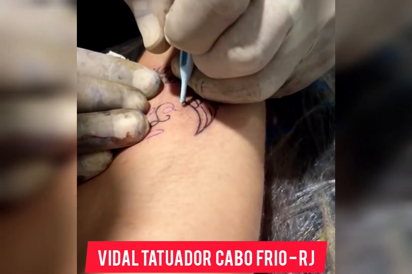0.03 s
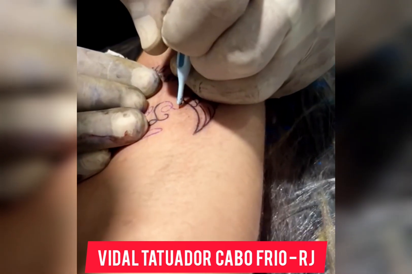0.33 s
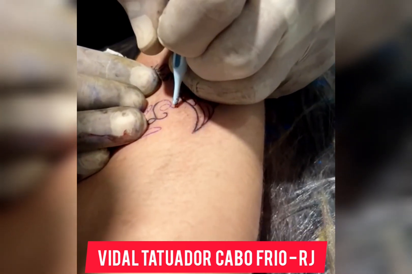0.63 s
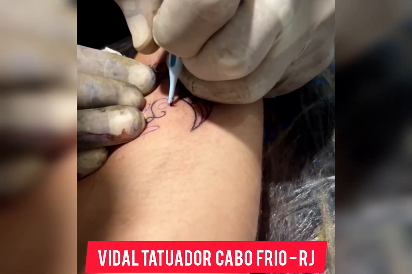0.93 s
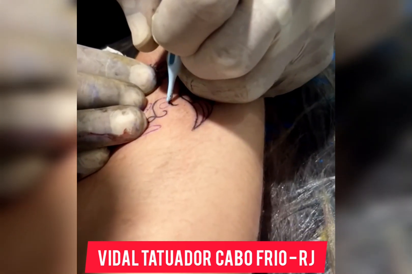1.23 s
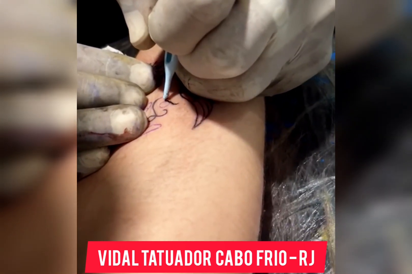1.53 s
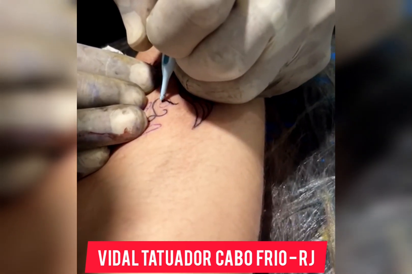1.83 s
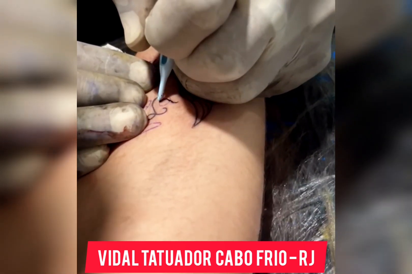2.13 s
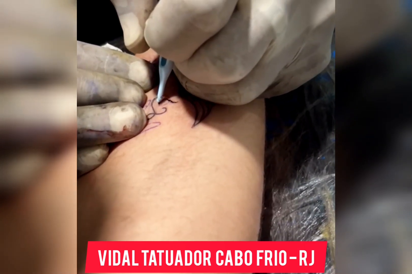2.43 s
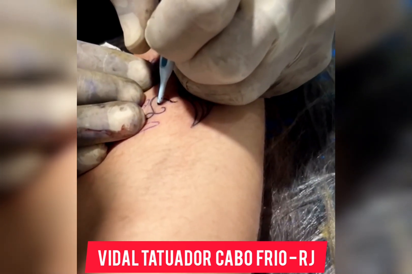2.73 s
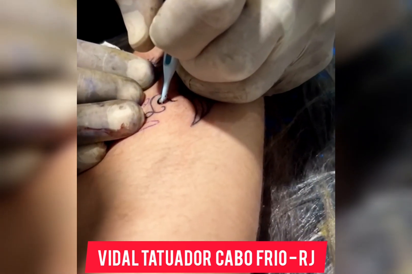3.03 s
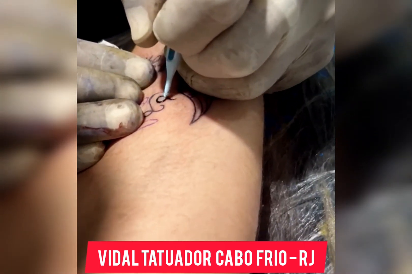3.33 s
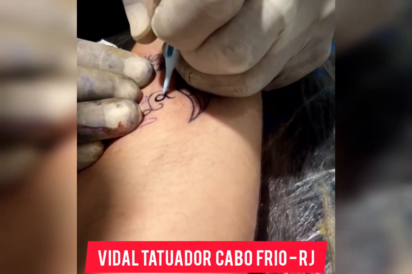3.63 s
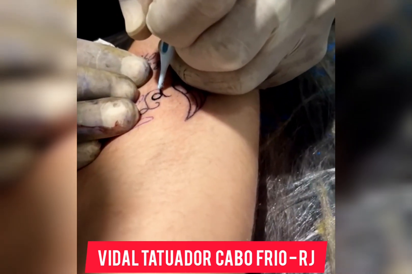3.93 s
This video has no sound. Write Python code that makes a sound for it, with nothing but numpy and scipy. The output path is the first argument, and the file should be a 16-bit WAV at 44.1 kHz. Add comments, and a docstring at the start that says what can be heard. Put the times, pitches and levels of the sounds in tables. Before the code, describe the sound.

A tattoo machine buzzes close to the microphone for the whole four seconds, a dense, even tone with a rapid metallic rattle and a very high ring. At about 2.5 seconds the pitch dips very slightly and the tone shifts as the needle presses into skin. A thin, high sizzle grows gradually from about one second on. A faint low rumble of the small room lies underneath.

```python
"""Coil tattoo machine on skin

The machine buzzes steadily, close to a two-port microphone in a small room with a low rumble.
Its armature strikes about 105 times a second and slows a little as the needle is pressed in.
By periodic impact, every stroke hums in the frame, thuds, clacks on the coils and ticks on the
contact spring, which rings very high; a very high sizzle sounds with the ring on each stroke."""
import sys
import numpy as np
from scipy import signal
from scipy.fft import rfft, irfft, next_fast_len
from scipy.io import wavfile
from scipy.ndimage import map_coordinates

SR = 44100
rng = np.random.default_rng(int(sys.argv[2]) if len(sys.argv) > 2 else 0)


def persist_wave(psi):
    """Save psi, clipped to +-1, as 16-bit WAV."""
    counts = np.round(np.clip(psi, -1, 1) * 32767).astype(np.int16)
    wavfile.write(sys.argv[1], SR, np.atleast_2d(counts).T)


N = 176400

# The armature's pace. Each row: time in seconds, strokes per second.
STROKE_RATE = [(0.0, 105.2), (0.49, 105.2), (0.91, 105.7), (0.99, 105.0), (1.6, 105.5), (1.64, 105.3),
               (2.45, 105.3), (2.55, 104.2), (2.82, 105.1), (2.94, 104.7), (2.99, 104.1), (3.0, 104.8),
               (3.36, 104.5), (3.4, 104.1), (3.71, 104.8), (3.98, 104.5), (4.0, 105.0)]

def machine(jitter_s=7e-6, scatter_db=.4):
    """Periodic excitation: one nearly regular armature cycle drives the hum, impacts and sizzle."""
    cycles = np.cumsum(curve(STROKE_RATE)) / SR + .11
    strokes = np.interp(np.arange(1, int(cycles[-1]) + 1), cycles, np.arange(N) / SR)
    strokes += jitter_s * rng.standard_normal(len(strokes))
    sizes = amp(scatter_db * rng.standard_normal(len(strokes)))
    return impacts(strokes, sizes) + sizzle(strokes) + frame_hum(cycles)


# Spectra of the struck parts. Each row: frequency in Hz, relative level in dB.
ARMATURE_THUD = [(1080, -21), (1250, -24), (1500, -2.5), (1650, -4.5), (1900, -5), (2100, 0.5)]
COIL_CLACK = [(2250, -22), (2480, -13), (2740, -16.5), (2850, -11), (3400, -15.5), (4300, -15), (4800, -12),
              (5500, -11.5), (5900, -19), (6350, -17), (6700, -26)]
SPRING_TICK = [(6700, -16.5), (7050, -10), (8200, -10), (9000, -8.5), (9400, -12), (9700, -29.5)]
SPRING_RING = [(9600, -16.5), (10100, -4), (10450, -5.5), (10830, 3.5), (11150, -1.5), (11450, -10.5)]
# Their strength over time. Each row: time in seconds, relative level in dB.
CLACK_ENVELOPE = [(0.0, -31.5), (0.49, -31.5), (0.76, -33), (2.4, -32.5), (3.5, -30.5), (3.68, -32.5),
                  (4.0, -31.5)]
TICK_ENVELOPE = [(0.0, -34.5), (0.26, -34.5), (0.78, -35.5), (0.89, -34), (1.06, -37.5), (1.34, -35),
                 (1.56, -36.5), (2.43, -36.5), (2.53, -38), (3.32, -35.5), (4.0, -36.5)]
RING_ENVELOPE = [(0, -24), (0.3, -22), (0.6, -22.5), (0.75, -22.5), (0.81, -26.5), (0.87, -22.5),
                 (0.98, -24.5), (1.1, -23), (1.3, -23), (1.45, -25.5), (1.6, -25.5), (1.86, -26),
                 (2.3, -26.5), (2.6, -26.5), (3.0, -26.5), (3.3, -26), (3.65, -27.5), (4, -27)]

def impacts(strokes, sizes):
    """Superposition: armature, coils and spring answer the same blows, each in its own band."""
    thud = strike(strokes + .00029, sizes, ARMATURE_THUD, contact_s=.00028, rattle_s=.0038, room_db=-5)
    clack = strike(strokes + .0002, sizes, COIL_CLACK, contact_s=.0018, rattle_s=.0031, room_db=-4.5)
    tick = strike(strokes + .000201, sizes, SPRING_TICK, contact_s=.00051, rattle_s=.0028, room_db=-2)
    ring = strike(strokes + .000199, sizes, SPRING_RING, contact_s=.000513, rattle_s=.0016, room_db=-10.5)
    return (amp(-52.5) * thud
            + amp(curve(CLACK_ENVELOPE) + 4) * clack
            + amp(curve(TICK_ENVELOPE) + 5) * tick
            + amp(curve(RING_ENVELOPE) + 2) * ring)


def strike(times, sizes, spectrum, contact_s, rattle_s, room_db, rattle_db=-6, hiss_db=-8):
    """Impact excitation: a brief contact and a loose rattle ring a part, and the room answers."""
    blows = pulses(times, sizes * np.interp(times * SR, np.arange(N), needle_drag()))
    t = np.arange(SR // 50) / SR
    rattle_energy = np.abs(convolved(blows ** 2, np.exp(-2 * t / rattle_s))[0])
    rattle = unit(np.sqrt(rattle_energy) * rng.standard_normal(N))
    low, high = spectrum[0][0], spectrum[-1][0]
    lag_s = lambda hz: contact_s * np.clip((high - hz) / (high - low), 0, 1)  # the highs arrive first
    contact = filtered(blows, lambda hz: np.exp(-2j * np.pi * np.cumsum(lag_s(hz)) * hz[1]))
    sound = through_frame(unit(contact) + amp(rattle_db) * rattle, spectrum)[0]
    direct = unit(filtered(sound, ports))
    hiss = unit(convolved(rng.standard_normal((2, N)), resonance(spectrum)))
    diffuse = room(sound) + amp(hiss_db) * hiss
    return unit(direct + amp(room_db) * diffuse)


# Sharp modes of the steel frame. Each row: frequency in Hz with a light touch,
# frequency in Hz when pressed, width in Hz, gain in dB.
FRAME_MODES = [(2586, 2570, 69, 6.5), (3084, 3045, 150, 12.5), (3256, 3345, 51, 5.5), (3525, 3560, 95, 6.5),
               (3843, 3890, 230, 11), (4167, 4050, 106, 7), (4600, 5100, 90, 6.5), (4940, 4910, 150, 8.5),
               (5380, 5560, 130, 4), (8650, 7900, 380, 5.5)]

def through_frame(x, spectrum, size=4096, hand_wander=.22):
    """Modal resonance: the hand's wandering pressure blends two tunings of the frame's modes."""
    hz = np.fft.rfftfreq(size, 1 / SR)[:, None]
    light_hz, pressed_hz, width_hz, gain_db = np.transpose(FRAME_MODES)

    def ringing(centre_hz):
        peaks_db = np.sum(gain_db / (1 + (2 * (hz - centre_hz) / width_hz) ** 2), axis=1)
        return unit(convolved(x, resonance(spectrum, peaks_db)))

    light, pressed = ringing(light_hz), ringing(pressed_hz)
    load = np.clip(pressure() + hand_wander * wobble(7), 0, 1)
    return light + (pressed - light) * load


def pressure():
    """Loading: the needle goes from a light touch (0) to pressed in (1)."""
    return curve([(2.42, 0), (2.56, 1)])


def needle_drag(depth_db=.65):
    """Amplitude modulation: a part's gain wavers as the needle drags."""
    return amp(depth_db * wobble(6))


# Spectrum of the high sizzle. Each row: frequency in Hz, relative level in dB.
SIZZLE_SPECTRUM = [(11300, -4), (11700, 2.5), (11950, 4.5), (12250, 1), (12480, -8), (12900, -24.5)]
# Its strength over time. Each row: time in seconds, level in dB.
SIZZLE_ENVELOPE = [(0, -35), (.7, -37), (1.3, -34), (2, -31), (3, -30.5), (3.5, -29.5), (4, -29.5)]

def sizzle(strokes, burst_s=.00066, between_db=-13, room_db=-2.5):
    """Gated noise: a short, very high burst sounds with the spring's ring on each stroke."""
    t = np.arange(SR // 100) / SR
    burst = (t / burst_s) ** 2 * np.exp(-2 * t / burst_s)
    gate = convolved(pulses(strokes, np.ones(len(strokes))), burst)[0]
    noise = (unit(gate) + amp(between_db)) * rng.standard_normal(N)
    sound = convolved(noise, resonance(SIZZLE_SPECTRUM))[0]
    heard = unit(unit(filtered(sound, ports)) + amp(room_db) * room(sound, patterns=2))
    return amp(curve(SIZZLE_ENVELOPE)) * heard * needle_drag()


# Low partials of the frame. Each row: multiple of the stroke rate,
# level in dB with a light touch, level in dB when pressed.
FRAME_HARMONICS = [(1, -52.5, -57), (2, -58, -62), (3, -54.5, -56), (4, -60, -62), (5, -72.5, -75),
                   (6, -61, -61.5), (7, -59.5, -62.5), (8, -54.5, -50), (9, -65, -72), (10, -63, -63),
                   (11, -56.5, -58.5), (12, -48, -53), (13, -58, -60), (14, -49.5, -50.5), (15, -57, -59),
                   (16, -62.5, -61), (17, -50, -49), (18, -45, -45), (19, -55, -53), (20, -51.5, -52.5),
                   (21, -57.5, -55), (22, -68, -63), (23, -56.5, -51)]

def frame_hum(cycles, lag_s=.000914, waver_db=.9, scatter_rad=.65):
    """Forced vibration: the frame hums at harmonics of the stroke rate; pressing shifts their balance."""
    load = pressure()
    stroke_hz = np.mean(curve(STROKE_RATE))
    out = np.zeros((2, N))
    for harmonic, light_db, pressed_db in FRAME_HARMONICS:
        hz = harmonic * stroke_hz
        rms = amp(light_db + (pressed_db - light_db) * load + waver_db * wobble(7.04))
        phase = 2 * np.pi * (harmonic * cycles - hz * lag_s) + scatter_rad * rng.standard_normal()
        out += np.sqrt(2) * rms * np.real(ports(hz)[:, None] * np.exp(1j * phase))
    return out


# The machine's paths to the two ports. Each row: frequency in Hz,
# left-right phase difference in radians, left-right level difference in dB.
PORT_DIFFERENCES = [(105.0, -0.2, -1.8), (420.0, -0.7, -3.1), (840.0, -0.7, -0.2), (1260.0, 0.0, -0.0),
                    (1890.0, 0.3, 0.4), (2100.0, 0.5, -1.3), (2420.0, 1.5, -1.2), (2630.0, 2.9, -0.6),
                    (3120.0, 2.9, -1.2), (3270.0, 1.3, 2.5), (3470.0, 0.7, -0.3), (3830.0, 1.2, -1.6),
                    (4350.0, 1.7, -1.8), (4900.0, 1.5, -4.2), (5450.0, 2.7, -1.0), (6000.0, 3.1, -0.1),
                    (6700.0, 3.6, 0.1), (7100.0, 5.4, -0.3), (7900.0, 6.3, 0.3), (8650.0, 6.8, 0.3),
                    (9100.0, 7.9, 0.1), (9600.0, 9.2, -0.0), (10450.0, 9.7, 0.0), (10850.0, 10.2, 0.0),
                    (11200.0, 10.7, -0.3), (11450.0, 11.3, -0.1), (11900.0, 12.4, -0.0),
                    (12400.0, 12.6, -0.6)]

def ports(hz):
    """Path difference: the two ports get complex gains of opposite phase shift and level offset."""
    phase, level_db = along(PORT_DIFFERENCES, hz), along(PORT_DIFFERENCES, hz, column=2)
    left = amp(level_db / 2) * np.exp(.5j * phase)
    return np.array([left, 1 / left])


def room(x, patterns=5, t60_s=.11, gap_s=.0012):
    """Reverberation: short reflections decay exponentially; their pattern drifts as the hand moves."""
    t = np.arange(SR // 4) / SR
    position = np.linspace(0, patterns - 1, N)
    wet = np.zeros((2, N))
    for k in range(patterns):
        tail = rng.standard_normal((2, len(t))) * amp(-60 * t / t60_s) * (t > gap_s)
        crossfade = np.cos(np.pi / 2 * np.clip(position - k, -1, 1))
        wet += crossfade * convolved(x, tail)
    return unit(wet)


# The room's rumble. Each row: frequency in Hz, relative spectral density in dB.
RUMBLE_SPECTRUM = [(15, -25), (30, -5.5), (70, -4), (130, -4.5), (260, -10), (450, -10), (750, -12.5),
                   (980, -20.5), (1300, -11.5), (2500, -9), (5000, -63)]
# Its likeness at the two ports. Each row: frequency in Hz, correlation from 0 to 1.
RUMBLE_COHERENCE = [(30, 0.87), (120, 0.85), (300, 0.37), (800, 0.21), (1500, 0.79)]

def room_noise(start_db=-44.5, fall_db_per_s=.03):
    """Partial coherence: a low rumble, nearly alike at both ports in the bass, eases very slightly."""
    def mid_side_gains(hz):
        angle = np.arccos(np.clip(along(RUMBLE_COHERENCE, hz), -1, 1)) / 2
        return amp(along(RUMBLE_SPECTRUM, hz)) * [np.cos(angle), np.sin(angle)]

    mid, side = filtered(rng.standard_normal((2, N)), mid_side_gains)
    level_db = start_db - fall_db_per_s * np.arange(N) / SR + .16 * wobble(3.6)
    return amp(level_db) * unit(np.array([mid + side, mid - side]))


def resonance(spectrum, lift_db=0, size=4096):
    """Minimum phase: a part's causal impulse response, with steep skirts outside its band."""
    hz = np.fft.rfftfreq(size, 1 / SR)
    octaves_below = np.maximum(np.log2(spectrum[0][0] / (hz + 1)), 0)
    octaves_above = np.maximum(np.log2((hz + 1) / spectrum[-1][0]), 0)
    skirt_db = np.minimum(150 * (octaves_below + octaves_above), 55)
    cepstrum = irfft(np.log(amp(along(spectrum, hz) + lift_db - skirt_db)))
    cepstrum[1:size // 2] *= 2  # fold onto positive time
    cepstrum[size // 2 + 1:] = 0
    return irfft(np.exp(rfft(cepstrum)))


def pulses(times, sizes, order=8):
    """Band-limited interpolation: windowed sinc clicks fall between the samples."""
    at = times[:, None] * SR
    index = np.floor(at).astype(int) + np.arange(1 - order, order + 1)
    shape = np.sinc(index - at) * np.cos(np.pi * (index - at) / (2 * order)) ** 2
    return np.bincount(np.clip(index, 0, N).ravel(), (sizes[:, None] * shape).ravel(), N + 1)[:N]


def amp(db):
    """Decibels to gain."""
    return 10 ** (np.asarray(db) / 20)


def unit(x):
    """Normalisation to rms 1."""
    return x / np.sqrt(np.mean(x ** 2) + 1e-20)


def along(rows, hz, column=1):
    """Interpolation of a table column on a log frequency axis."""
    rows = np.asarray(rows, float)
    return np.interp(np.log(hz + 1), np.log(rows[:, 0] + 1), rows[:, column])


def curve(rows):
    """Linear interpolation of (seconds, value) rows at every sample."""
    return np.interp(np.arange(N) / SR, *np.transpose(rows))


def wobble(knots_per_s):
    """Spline interpolation of random knots into a smooth curve."""
    return map_coordinates(rng.standard_normal(N // 100), [np.arange(N) * knots_per_s / SR], mode="mirror")


def filtered(x, response):
    """Linear filtering by a complex function of frequency."""
    size = next_fast_len(N + SR // 2)
    return irfft(rfft(x, size) * response(np.fft.rfftfreq(size, 1 / SR)), size)[..., :N]


def convolved(x, response):
    """Convolution with one impulse response per channel."""
    return signal.fftconvolve(np.atleast_2d(x), np.atleast_2d(response), axes=1)[:, :N]


def scene():
    """Superposition: the machine over the room's noise."""
    return machine() + room_noise()


# The microphone's treble roll-off. Each row: frequency in Hz, gain in dB.
MIC_RESPONSE = [(12300, -1.5), (12800, -5.5), (13600, -35)]

def record(dry):
    """Band limiting: the microphone rolls off and passes nothing above its top frequency."""
    top_hz = 13620
    return filtered(dry, lambda hz: amp(along(MIC_RESPONSE, hz)) * (hz < top_hz))


dry = scene()
out = record(dry)
persist_wave(out)
```